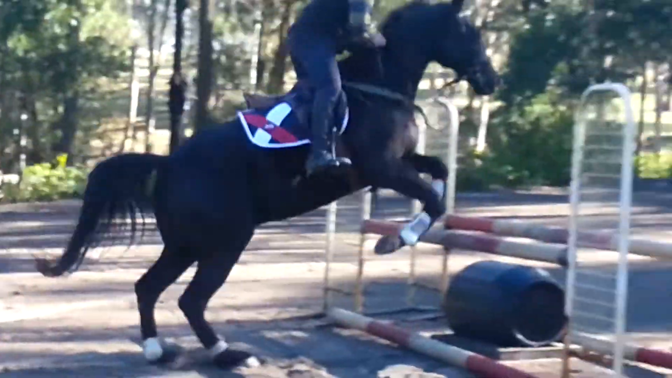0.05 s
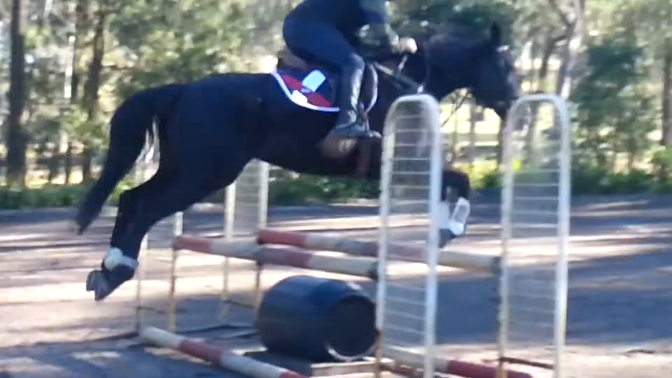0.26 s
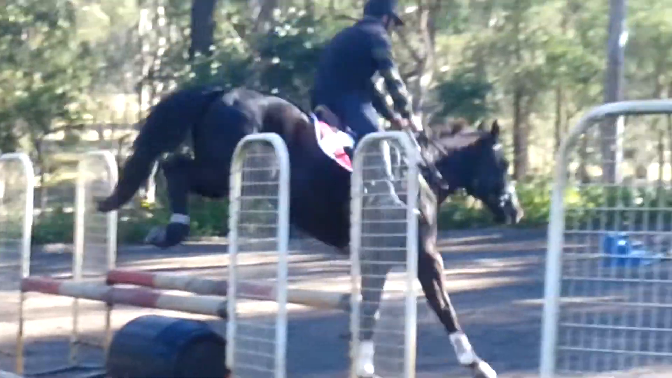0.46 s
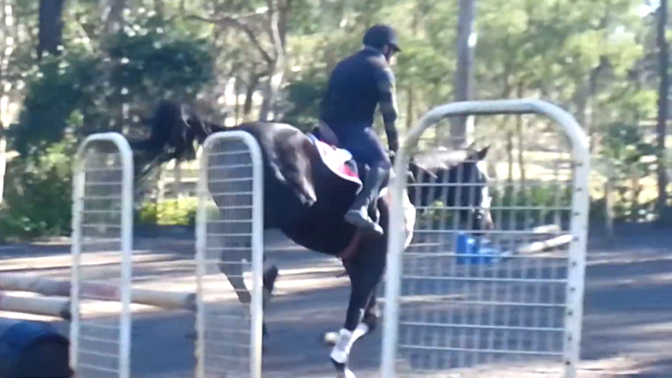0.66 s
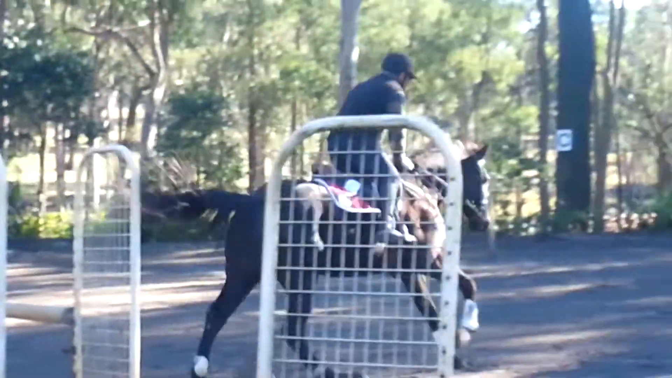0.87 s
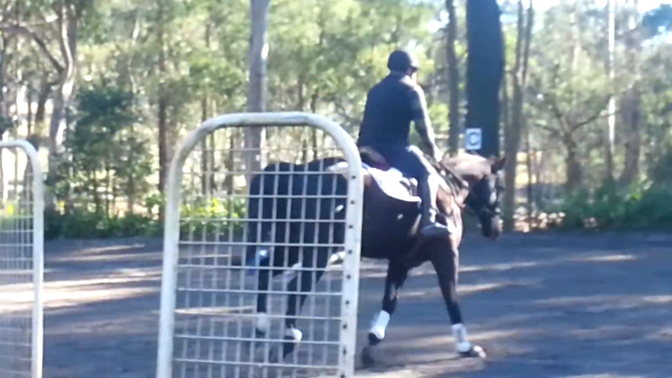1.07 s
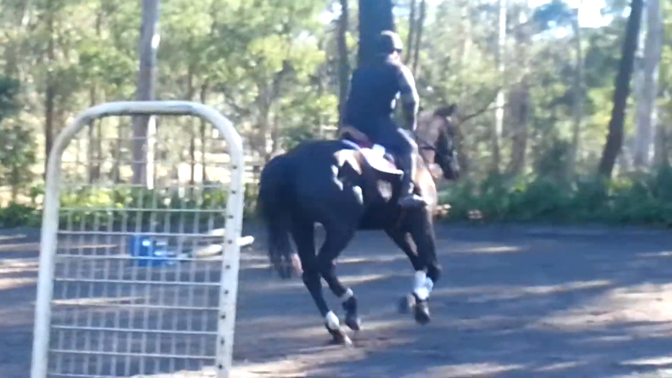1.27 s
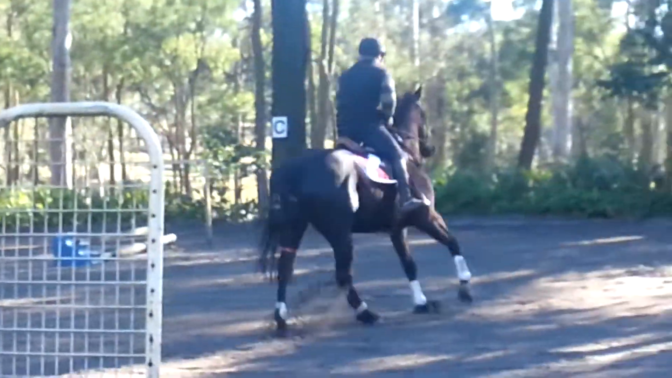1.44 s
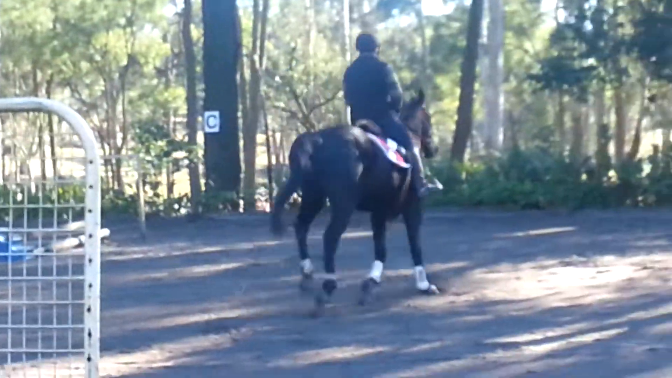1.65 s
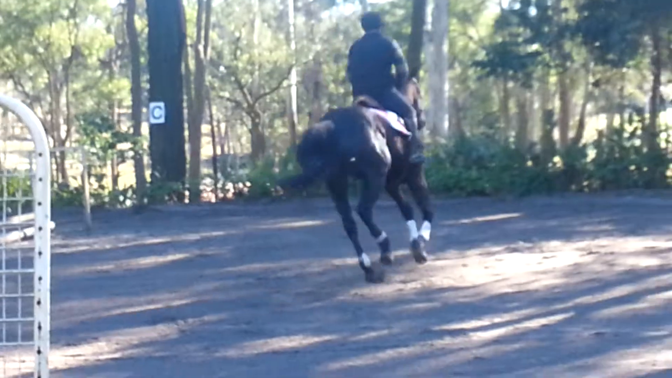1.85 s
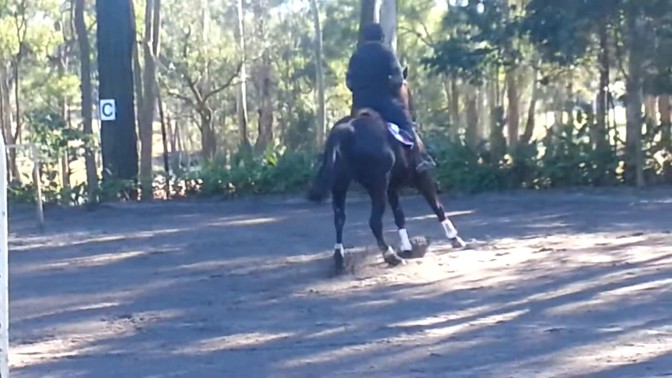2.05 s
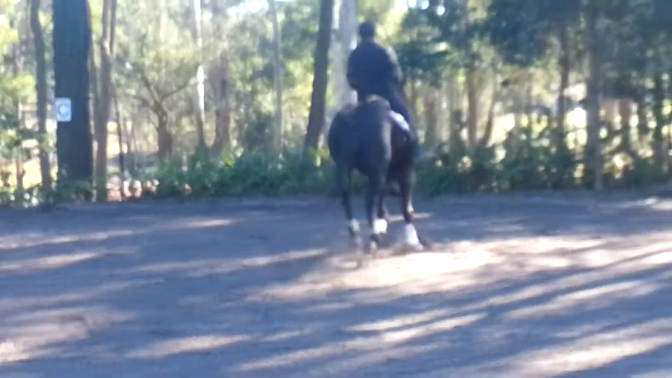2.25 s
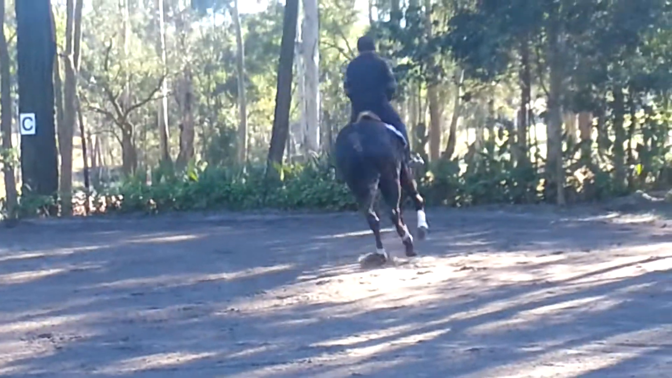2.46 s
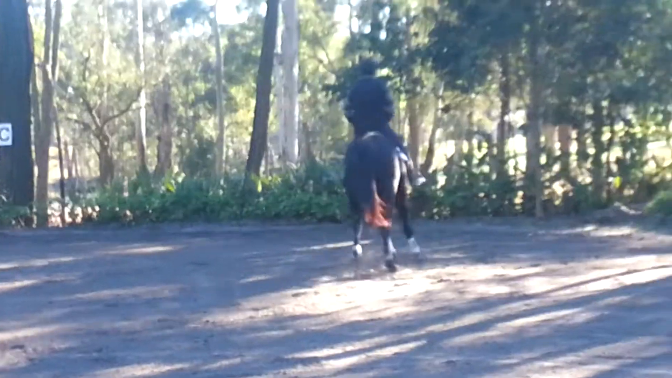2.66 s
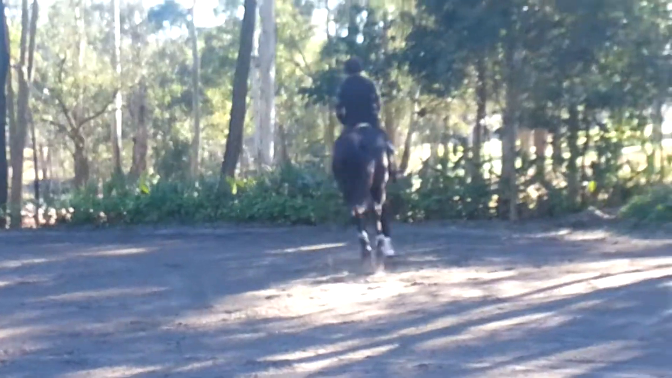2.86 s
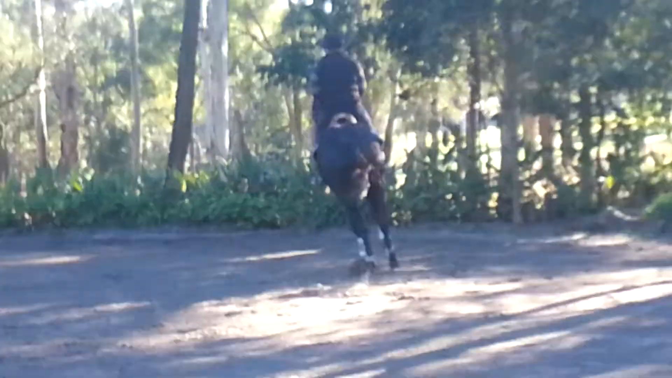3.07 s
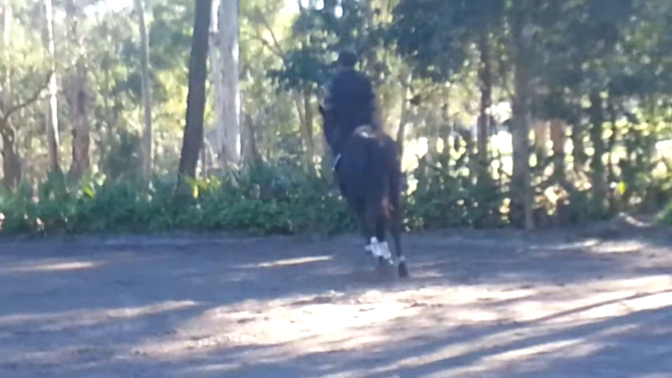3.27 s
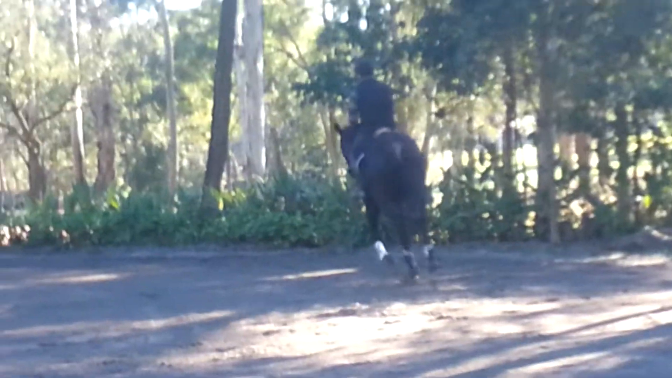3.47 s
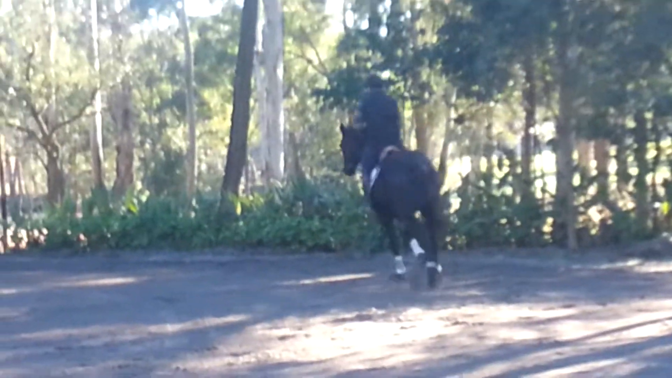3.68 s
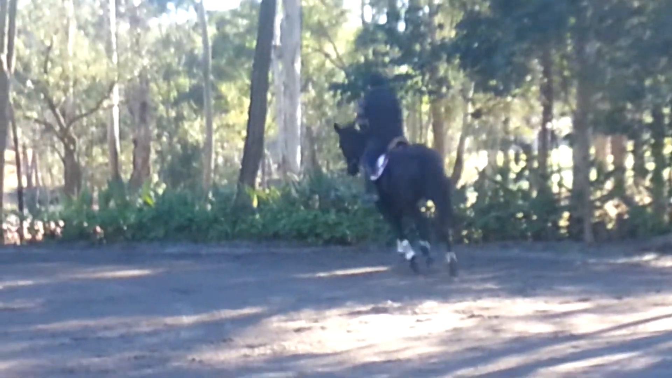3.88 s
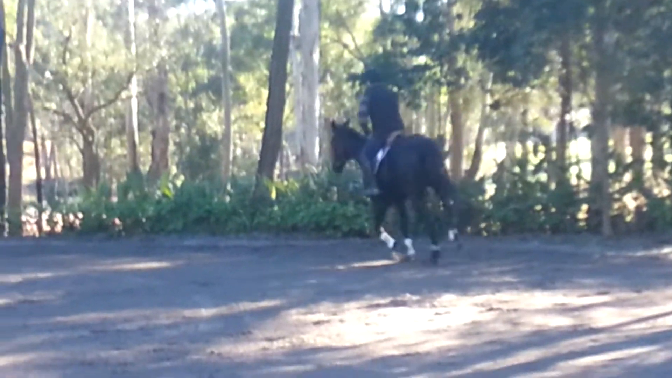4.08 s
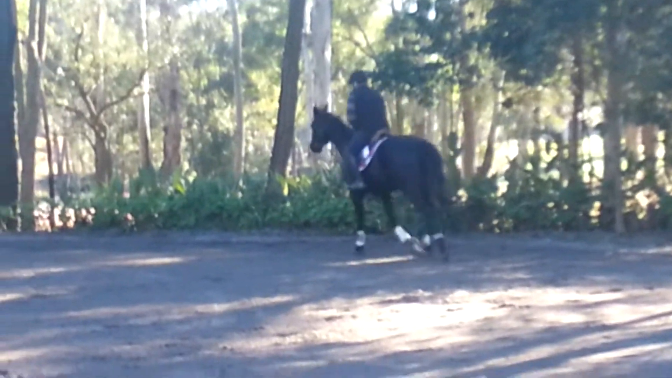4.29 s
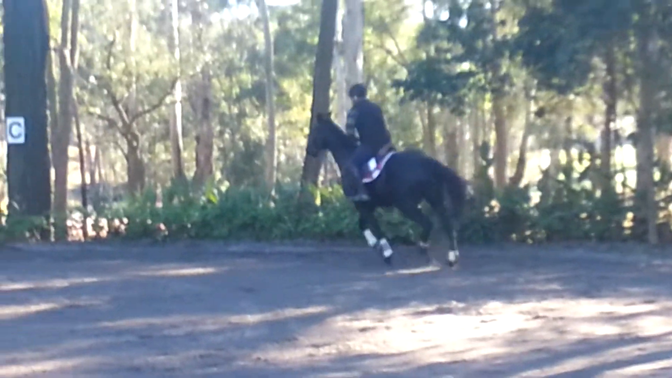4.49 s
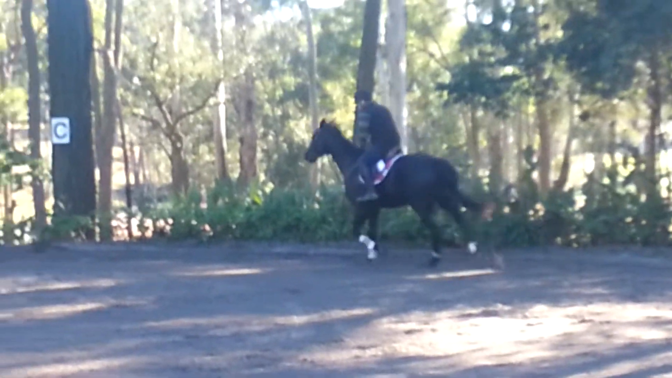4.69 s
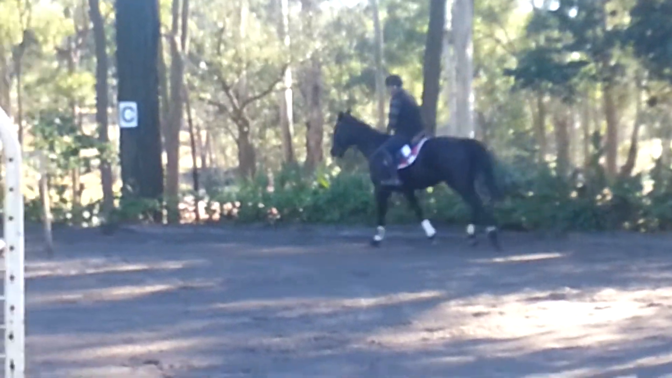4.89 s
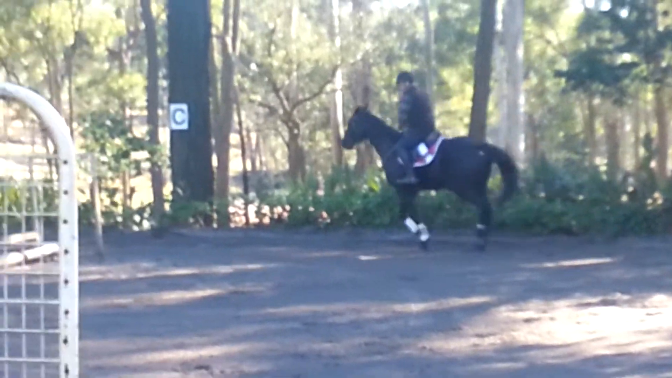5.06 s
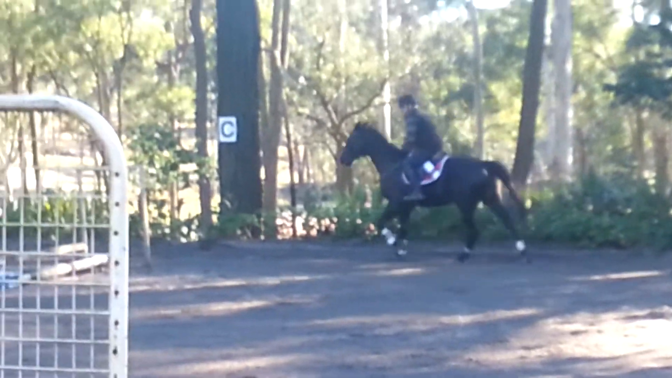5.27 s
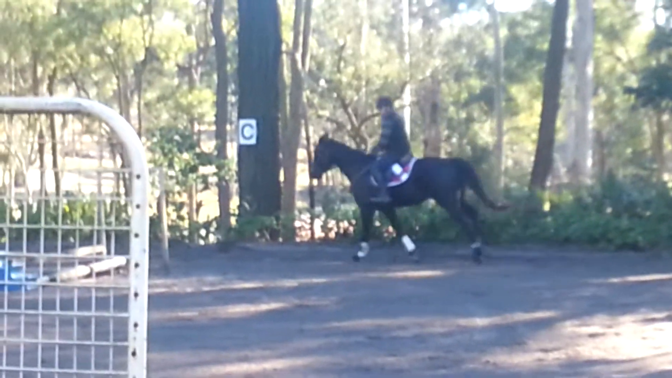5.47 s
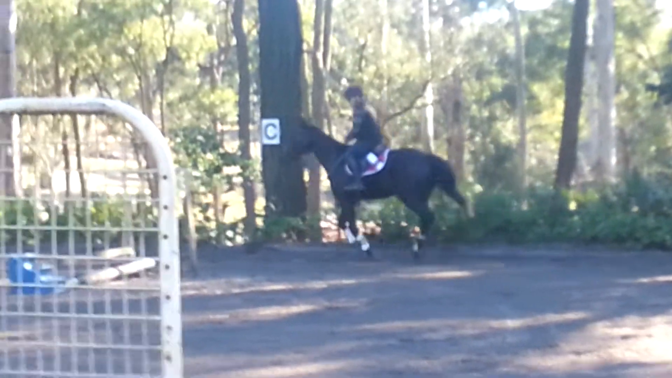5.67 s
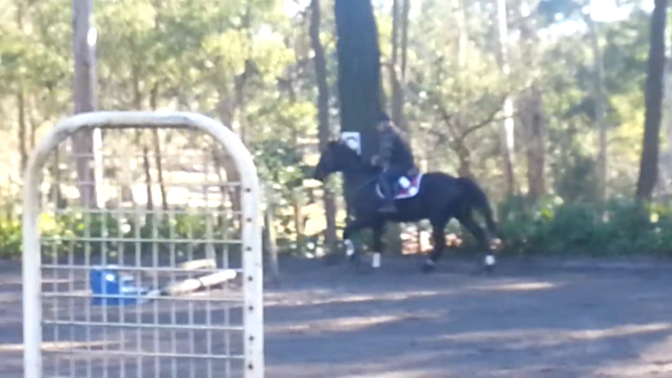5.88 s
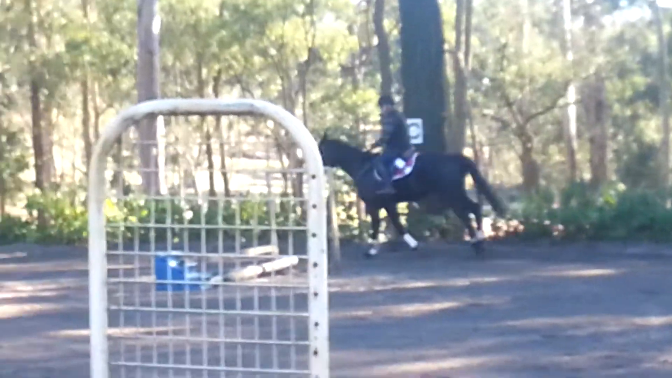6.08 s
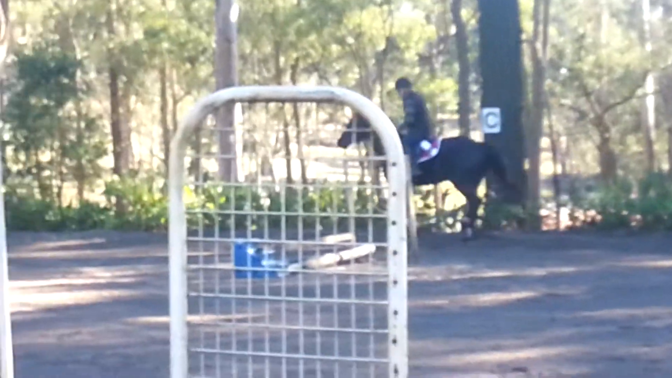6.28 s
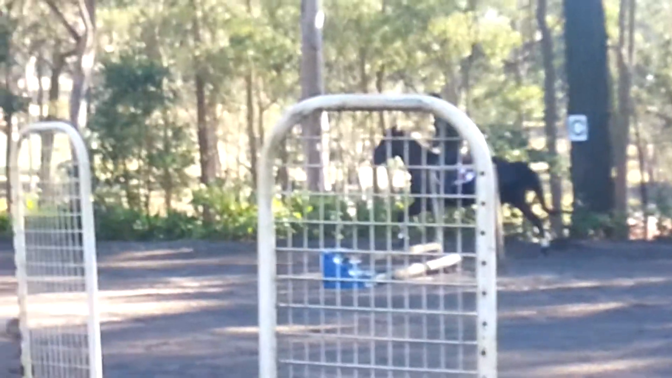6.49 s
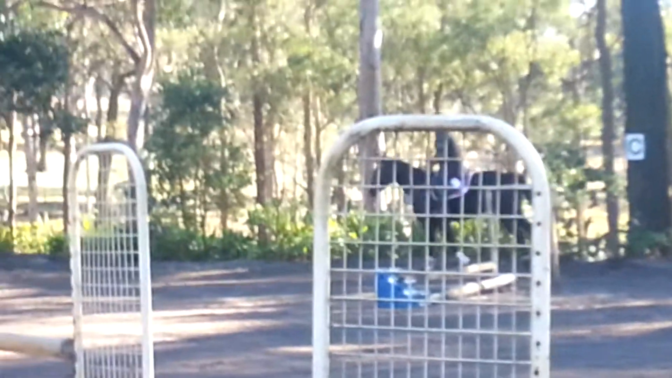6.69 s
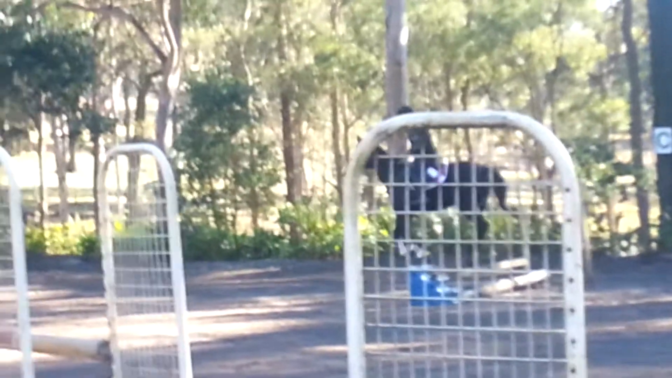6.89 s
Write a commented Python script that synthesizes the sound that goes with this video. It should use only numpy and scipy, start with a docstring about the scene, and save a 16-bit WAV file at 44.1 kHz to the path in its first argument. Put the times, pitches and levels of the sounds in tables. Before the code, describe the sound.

Open air among trees, with a steady low hum and thin hiss. At 0 s heavy hooves thud and scuff sand close by. At about 0.33 s a cluster of very quick, hard cracks strikes the rail, by far the loudest event; a bright steel ring and shaken mesh rattle die away by about 1.1 s. Irregular footfalls, knocks and gritty sand continue to 1.7 s, with a stronger deep thud at 1.64 s. From 2 s a soft three-beat canter repeats roughly every 0.6 s, growing fainter. Small birds whistle at 0.6 to 2.7 s, then clearer falling chirps at 3.7, 4.3 and 4.8 s and a string at 5.2 to 5.8 s. Tiny close clicks appear around 1.1, 1.6, 3.2 and 4.1 s, sharpest at 5.7 s on the right. Fluttering, breathy horse snorts come at 6.15 and 6.78 s, with faint bird pips.

```python
"""Hooves thud into sand, then a jumping horse raps the fence: quick cracks, a clanging steel stand, rattling mesh.
Birds whistle from the trees, with a few sharp clicks close by, as the horse canters off in three-beat strides.
It grows fainter, and near the end it snorts twice. A low outdoor hum lies under it all.
Hooves are damped sines, sand is grains in bursts, the fence is noise and decaying modes, birds are gliding
sines, and the snorts and the open air are shaped noise; scattered echoes set horse, fence and birds among trees."""
import sys
import numpy as np
from scipy import signal
from scipy.fft import rfft, irfft
from scipy.io import wavfile
from scipy.ndimage import uniform_filter1d

SR = 44100
rng = np.random.default_rng(int(sys.argv[2]) if len(sys.argv) > 2 else 0)


def inscribe(sig):
    """Save sig as 16-bit PCM at rate SR to the path in sys.argv[1].

    A 1-D sig is mono; a 2-D sig holds one channel per row.
    Samples are clipped to [-1, 1] before scaling.
    """
    pcm = np.round(np.clip(np.atleast_2d(sig).T, -1, 1) * 32767)
    wavfile.write(sys.argv[1], SR, pcm.astype(np.int16))


N = 306054  # length [samples]

# single footfalls, strong and faint, most around the jump, before trims:
# (time [s], thud [dB], hollow knock [dB], sand [dB])
SINGLE_FOOTFALLS = [(0.009, -32, -36, -41.5), (0.071, -28, -43, -42.5), (0.244, -41, -32.5, -37.5),
                    (0.275, -48, -50, -42), (0.537, -33, -43, -48), (0.609, -43, -32.5, -40),
                    (0.813, -43, -37, -47.5), (0.85, -43, -52, -39), (0.936, -38, -43, -41.5),
                    (0.967, -36, -47, -41), (0.989, -40, -52, -50), (1.054, -45, -43, -47),
                    (1.113, -39, -43, -47), (1.135, -41, -48, -42), (1.18, -52, -57, -46.5),
                    (1.31, -45, -42, -44), (1.35, -50, -48, -43), (1.395, -43, -39, -40),
                    (1.419, -43, -37.5, -50), (1.515, -41, -43, -44.5), (1.586, -46, -43, -47.5),
                    (1.64, -30, -48, -44.5), (1.715, -46, -50, -42), (3.19, -43, -54, -49),
                    (3.668, -54, -54, -48), (3.855, -52, -49, -49), (4.309, -39.5, -50, -58),
                    (4.334, -39.5, -51, -60), (6.764, -40, -53, -60), (6.79, -39, -53, -61)]
# far canter strides, before trims: (first beat [s], first to last beat [s], ground [dB], sand [dB])
CANTER_STRIDES = [(2.0, 0.27, -45.5, -50), (2.54, .33, -42.5, -50.5), (3.109, .276, -41.5, -54),
                  (3.668, .27, -49, -53), (4.19, .29, -51, -60), (4.79, .3, -47.5, -54),
                  (5.421, .29, -52, -53), (6.0, .29, -51, -60), (6.55, .287, -50, -63)]
# hind hoof, diagonal pair, leading fore: (share of the way from first to last beat, level [dB])
STRIDE_BEATS = [(0, 0), (0.62, -5), (1, 1)]
# spectrum of moving sand: (frequency [Hz], level per Hz [dB])
SAND_SPECTRUM = [(260, -17), (450, -5.5), (774, 6), (1150, -5.5), (1370, -0.5), (1710, 1), (2290, 1.5),
                 (2500, -1), (3890, -1), (6220, -10), (13700, -19), (15000, -34)]
# snorts, before the trim: (time of strongest nostril flap [s], its level [dB], opening flap level [dB])
SNORT_EVENTS = [(6.153, -37, -44), (6.7762, -34.7, -40)]
# spectrum of air through the nose: (frequency [Hz], level per Hz [dB])
NOSE_SPECTRUM = [(90, -22), (220, 5), (450, -14), (900, 2), (1500, -0.5), (2350, -2.5), (2700, -12),
                 (3400, -12.5), (4700, -7.5), (5700, -22), (9000, -33)]
# the hoof hits the fence and the rail chatters: (time [s], force [dB], contact time [s])
FENCE_BLOWS = [(0.328, -18, 0.00053), (0.331, -3, 0.00035), (0.334, -5.5, 0.000025),
               (0.337, -9.5, 0.000098), (0.343, -13, 0.00026), (0.354, -10.5, 0.000073),
               (0.3585, -22.5, 0.00012)]
# spectrum of the crack of each blow: (frequency [Hz], level per Hz [dB])
CRACK_SPECTRUM = [(71, -28), (120, -26), (238, 1), (524, -8), (629, -14), (835, -2.5), (1180, -8.5),
                  (1760, 0), (2540, -3), (2920, -15.5), (4290, 0.5), (6550, -13), (12800, -16.5),
                  (15000, -50)]
# modes of the rail's dull body: (frequency [Hz], level [dB], 60 dB decay [s])
RAIL_MODES = [(196.7, -13.5, .17), (229, -15, .1), (269, -9, 0.21), (324, -24, 0.056), (380, -28, 0.34),
              (508, -15.5, 0.25)]
# modes of the steel stand, before its fade: (frequency [Hz], level [dB], 60 dB decay [s])
STEEL_MODES = [(764, -6, 0.3), (1523, -21, 0.93), (1680, -22, 1.1), (2385, -14, 0.35), (2632, -15, 0.54),
               (2783, -18, 0.44), (3682, -22, 0.67), (3919, -9, 0.16), (4124, -15, 0.46), (4194, 0, 0.5),
               (4301, -14, 0.53), (4447, -15, 0.8), (4737, -25, 0.81), (4915, -25, 0.64), (5346, -29, 0.63)]
# spectrum of the shaken mesh: (frequency [Hz], level per Hz [dB])
MESH_SPECTRUM = [(150, -35), (270, -5), (600, -10), (780, -3), (1250, -12.5), (1600, -3.5), (2000, -17),
                 (2550, -2.5), (3200, -18), (4300, -1.5), (5200, -16.5), (6800, -24), (12000, -23),
                 (15000, -36)]
# small close clicks: (time [s], level [dB], ring [Hz], decay to 1/e [s], left-right [dB])
CLICK_EVENTS = [(1.0576, -24.5, 848, 0.0015, -2), (1.1147, -28.5, 650, .001, -2),
                (1.6213, -29, 4930, 0.00035, 15), (1.628, -30, 4450, .0007, -2),
                (3.1743, -31.5, 5600, 0.0004, 17), (4.076, -37.5, 2220, .0007, 5),
                (5.7067, -14, 1230, 0.00014, -31.5), (5.7084, -27.5, 234, 0.0034, -14),
                (5.714, -35, 1600, 0.0012, -14), (5.7351, -26.5, 4270, 0.00032, -14),
                (5.7715, -18.5, 3040, 0.00023, -16)]
# bird syllables: (time [s], singer, shape, length [s], pitch [Hz], level [dB])
BIRD_SYLLABLES = [(0.635, "left", "level", .04, 4550, -50), (0.672, "left", "fall", 0.042, 3190, -50.5),
                  (0.975, "left", "lift", .06, 4050, -53.5), (1.194, "left", "fall", .045, 2860, -56),
                  (1.758, "right", "rise", .115, 3700, -48), (1.902, "right", "level", 0.12, 4210, -44.5),
                  (2.198, "right", "rise", 0.096, 3480, -59), (2.37, "right", "lift", .1, 4000, -57),
                  (2.664, "far", "fall", 0.12, 5030, -57.5), (3.728, "near", "dive", .043, 4290, -42.5),
                  (3.788, "near", "arch", 0.043, 2420, -49), (4.263, "near", "dive", .047, 4220, -38.5),
                  (4.329, "near", "arch", .046, 2480, -47.5), (4.45, "left", "rise", 0.074, 4960, -59.5),
                  (4.781, "near", "fall", .026, 3560, -43.5), (4.806, "near", "arch", .027, 3250, -42.5),
                  (4.858, "near", "lift", .035, 2260, -49), (5.208, "left", "lift", 0.044, 4490, -55),
                  (5.312, "left", "sweep", .073, 4600, -49.5), (5.436, "left", "level", .047, 4516, -49.5),
                  (5.505, "left", "lift", .06, 4405, -49.5), (5.603, "left", "sweep", .044, 4600, -56.5),
                  (5.817, "left", "level", 0.039, 5130, -59)]
# syllable shapes: (swell from start to end [dB], pitch along the way [multiples of the syllable's pitch])
SYLLABLE_SHAPES = {"dive": (4, (1.15, 1.05, .995, .89, .68)), "arch": (-2, (.8, 1.09, 1.03, .79)),
                   "rise": (3, (.83, .96, 1.045, 1.18)), "sweep": (8, (.76, .89, 1.04, 1.24)),
                   "fall": (2, (1.12, 1.05, .95, .85)), "level": (-3, (1.03, 1, .985, .958)),
                   "lift": (0, (.95, 1.005, 1.01, 1))}
# singers: (left-right [dB], echo send [dB], delay of the left side [s], tone an octave below [dB])
BIRD_SINGERS = {"near": (5, -6, .00039, -30), "left": (5, -6, 0, -17), "right": (-4, -7, 0, -30),
                "far": (5, -6, 0, 1)}
# a farther bird piping on level notes: (time [s], pitch [Hz], level [dB])
BIRD_PIPS = [(3.895, 2630, -61), (4.12, 3340, -58), (4.17, 2640, -62), (6.34, 3350, -57.5),
             (6.5, 3340, -59.5), (6.635, 3350, -61)]
# decay of the echoes among the trees: (frequency [Hz], 60 dB decay [s])
TREE_DECAY = [(200, 0.22), (1500, 1.54), (4000, 1.03), (12000, 0.22)]
# spectrum of the open air: (frequency [Hz], level per Hz [dB])
AIR_SPECTRUM = [(15, -68), (25, -42), (59, -10.5), (150, -5), (186, -3), (394, -3), (427, -5.5), (729, -6),
                (1760, -17.5), (3350, -18.5), (3630, -16.5), (4870, -19.5), (5570, -25), (13800, -26.5),
                (15000, -37.5)]
# slow course of the air, before its trim: (time [s], level [dB])
AIR_LEVEL = [(0.0, -47), (0.23, -46.5), (3.77, -49.6), (6.94, -49.4)]
# what the two ears share of the air: (frequency [Hz], left-right likeness)
AIR_LIKENESS = [(60, 0.95), (150, 0.91), (380, 0.74), (950, -0.02), (2380, 0.079), (5980, -0.051),
                (15000, -0.033)]
# what they share of sand, cracks and mesh: (frequency [Hz], left-right likeness)
NEAR_LIKENESS = [(200, 1), (900, 0.93), (2200, 0.44), (4000, 0.4), (12000, 0.05)]
# what they share of the snorts: (frequency [Hz], left-right likeness)
FAR_LIKENESS = [(300, 0.9), (1200, 0.85), (5000, 0.73)]
# stereo tilt of the direct horse and fence: (frequency [Hz], left-right [dB])
STEREO_TILT = [(300, -0.5), (1500, -2), (2300, 4.5), (3400, 1.5), (4200, 2), (5500, 8.5), (8000, 1.5),
               (12000, -7)]

FAR_THUD_DB = -4  # a far thud against its knock, before the trims of both
SCUFF_LAG_S, SCUFF_HALF_S = 0.0067, 0.0125  # the hoof slides just after it lands
SPRAY_LAG_S, SPRAY_HALF_S, SPRAY_DB = 0.04, 0.035, -12  # thrown sand falls back; level against the scuff
FLAP_GAP_S, FLAP_HALF_S = 0.0342, 0.0066  # the first flap
FLAP_SLOWING, FLAP_FADE_DB = 1.15, -6  # each flap is slower and weaker as the air runs out
STEEL_DB = -19.8
EDGE_HZ = 15000


def hooves(thud_hz=225, thud_s=0.0024, thud_db=3, knock_hz=680, knock_s=0.0012, knock_db=1):
    """Each hoof gives the packed ground a damped low push, with a short knock of the horn."""
    out, t, steps = np.zeros((2, N)), clock(.08), footfalls()
    chances = rng.uniform(-0.97, 1, (len(steps), 2))
    for (s, low_db, high_db, _), (thud_chance, knock_chance) in zip(steps, chances):
        thud = low_db + thud_db, thud_hz * (1 + 0.24 * thud_chance), thud_s
        knock = high_db + knock_db, knock_hz * (1 + 0.27 * knock_chance), knock_s
        for db, hz, rise in (thud, knock):
            push = t / rise * np.exp(1 - t / rise)  # peaks after the rise time
            add(out, s, amp(db) * push * np.sin(2 * np.pi * hz * t))
    return out


def footfalls():
    """Every hoof that lands, as (s, thud dB, knock dB, sand dB): the single ones, then the three-beat canter."""
    steps = list(SINGLE_FOOTFALLS)
    for s, spread, ground_db, sand_db in CANTER_STRIDES:
        for share, db in STRIDE_BEATS:
            knock_db = ground_db + db
            steps.append((s + share * spread, knock_db + FAR_THUD_DB, knock_db, sand_db + db))
    return steps


def sand(level_db=0):
    """Thousands of grains of uneven size: a scuff under each hoof, then a spray behind it."""
    sizes = amp(3 * np.minimum(rng.exponential(1, (2, N)), 3.5)) * rng.choice([-1, 1], (2, N))
    grains = sizes * (rng.random((2, N)) < 2500 / SR)  # 2500 grains a second in each signal
    scuffs = [(s + SCUFF_LAG_S, db, SCUFF_HALF_S) for s, _, _, db in footfalls()]
    sprays = [(s + SPRAY_LAG_S, db + SPRAY_DB, SPRAY_HALF_S) for s, _, _, db in footfalls()]
    return amp(level_db) * swells(scuffs + sprays) * colour(grains, SAND_SPECTRUM, NEAR_LIKENESS)


def snorts(level_db=-1, body_db=-13):
    """Air blown through the horse's nose, chopped and roughened by its fluttering nostrils."""
    rows = [flap for snort in SNORT_EVENTS for flap in flutter(*snort)]
    flaps = swells(rows, rise=.45, fall=1.1)
    stream = amp(body_db) * uniform_filter1d(flaps, size=3000)  # some air leaks between the flaps
    rasp = evened(amp(3 * drift(N, .001)))
    return amp(level_db) * (flaps + stream) * rasp * hiss(NOSE_SPECTRUM, FAR_LIKENESS)


def flutter(s, db, opening_db, count=4):
    """The nostril flaps of one snort, as (s, dB, half length s): an opening flap, then a slowing, fading run."""
    flaps = [(s - FLAP_GAP_S, opening_db, FLAP_HALF_S)]
    for k in range(count):
        stretch = FLAP_SLOWING ** (k + 1)
        flaps.append((s, db + k * FLAP_FADE_DB, FLAP_HALF_S * stretch))
        s = s + FLAP_GAP_S * stretch
    return flaps


def fence(crack_db=-3.4, crack_t60=0.078, crack_side_db=0.5, rail_db=-2, steel_side_db=1,
          rattle_db=-36, rattle_t60=0.92, rattle_side_db=0.5):
    """Quick blows crack on the rail; they set the steel stand ringing and its mesh rattling."""
    out, t = np.zeros((2, N)), clock(.8)
    rail = amp(rail_db) * ring(RAIL_MODES, t)
    for s, db, contact in FENCE_BLOWS:
        noise = hiss(CRACK_SPECTRUM, NEAR_LIKENESS, size=len(t))
        crack = amp(crack_db - 60 * t / crack_t60) * pan(crack_side_db) * noise
        soft = np.exp(-1 / (contact * SR))  # a longer contact takes away treble
        add(out, s, amp(db) * signal.lfilter([1 - soft], [1, -soft], crack + rail))
    sharpest = min(FENCE_BLOWS, key=lambda blow: blow[2])[0]  # time of the shortest contact
    # the stand takes up the shaking over several blows, and is damped at last
    shaking = (1 - np.exp(-t / .018)) * np.cos(np.pi / 2 * t / t[-1])
    add(out, sharpest, amp(STEEL_DB) * pan(steel_side_db) * shaking * ring(STEEL_MODES, t))
    add(out, sharpest, amp(rattle_db) * pan(rattle_side_db) * mesh(t, rattle_t60))
    return out


def ring(modes, t):
    """Decaying modes of a struck body."""
    return sum(amp(db - 60 * t / t60) * np.sin(2 * np.pi * hz * t) for hz, db, t60 in modes)


def mesh(t, t60, count=170, buzz=1.0):
    """A crowd of wire resonances at chance pitches, with buzz where wires touch; the buzz outlasts the wires."""
    hz = rng.uniform(250, 6500, count)
    decay = t60 * rng.uniform(0.78, 0.86, count)
    phase = rng.uniform(0, 2 * np.pi, (count, 2, 1))
    wires = sum(amp(-60 * t / d) * np.sin(2 * np.pi * f * t + p) for f, d, p in zip(hz, decay, phase))
    touching = buzz * amp(-60 * t / t60) * rng.standard_normal((2, len(t)))
    return colour(wires / np.sqrt(count) + touching, MESH_SPECTRUM, NEAR_LIKENESS)


def birds(waver=0.007, flutter_db=2):
    """Gliding, fluttering whistles, and the share of each that goes into the trees."""
    out, sent = np.zeros((2, 2, N))
    for s, singer, shape, length, pitch, db in BIRD_SYLLABLES:
        side_db, echo_db, lag, under_db = BIRD_SINGERS[singer]
        swell_db, bends = SYLLABLE_SHAPES[shape]
        t = clock(length)
        # a smooth curve through the pitch points
        curve = np.polyfit(np.linspace(0, 1, len(bends)), bends, len(bends) - 1)
        hz = pitch * np.polyval(curve, t / length)
        turns = np.cumsum(hz * (1 + waver * drift(len(t), 0.0057))) / SR
        turns = turns - np.outer([1, 0], hz * lag)  # the left side lags
        effort_db = swell_db * t / length + flutter_db * drift(len(t), .006)
        effort = signal.windows.tukey(len(t), .3) * amp(effort_db)
        tone = np.sin(2 * np.pi * turns) + amp(under_db) * np.sin(np.pi * turns)
        whistle = amp(db) * evened(pan(side_db) * effort * tone)
        add(out, s, whistle)
        add(sent, s, amp(echo_db) * whistle)
    t = clock(.06)
    for s, hz, db in BIRD_PIPS:
        effort = np.sin(np.pi * t / t[-1]) * amp(3 * drift(len(t), .005))
        pip = amp(db) * evened(effort * np.sin(2 * np.pi * hz * t))
        add(out, s, pip)
        add(sent, s, pip / 2)
    return out, sent


def clicks():
    """Tiny hard contacts that ring very briefly; the high ones are gritty."""
    out, t = np.zeros((2, N)), clock(.03)
    for s, db, hz, decay, side_db in CLICK_EVENTS:
        grit = np.clip(rng.standard_normal((2, len(t))), -1, 1) * .3 * min(hz / 4000, 1)
        add(out, s, amp(db) * pan(side_db) * np.exp(-t / decay) * (np.sin(2 * np.pi * hz * t) + grit))
    return out


def trees(x):
    """Scattered echoes from the trunks: a quick cluster, then a thin tail that dies band by band."""
    taps = rng.standard_normal((2, SR)) * (rng.random((2, SR)) < 2000 / SR)
    hz, t, bands = signal.stft(taps, SR, nperseg=256)
    cluster = amp(10 * np.exp(-t / .04)) * (1 - np.exp(-t / .004))
    fading = amp(-60 * t / read(TREE_DECAY, hz)[:, None])
    tail = signal.istft(bands * cluster * fading, SR, nperseg=256)[1]
    return signal.fftconvolve(x, tail / np.linalg.norm(tail[0]), axes=1)[:, :N]


def air(level_db=1.0, flutter_db=0.5):
    """The low hum and thin hiss of the open air; only the hum is slightly unsteady."""
    level = np.interp(np.arange(N) / SR, *np.transpose(AIR_LEVEL))
    wash = hiss(AIR_SPECTRUM, AIR_LIKENESS)
    hum = signal.sosfiltfilt(signal.butter(2, 1000, fs=SR, output="sos"), wash)
    unsteady = hum * amp(flutter_db * drift(N, 0.075))
    return amp(level + level_db) * (wash - hum + unsteady)


def amp(db):
    """Decibels to gain."""
    return 10 ** (np.asarray(db) / 20)


def evened(x):
    """Scales to rms 1."""
    return x / np.sqrt(np.mean(x ** 2) + 1e-20)


def read(points, hz):
    """A table of (Hz, value) read on a log-frequency axis."""
    f, value = np.transpose(points)
    return np.interp(np.log(hz + 1), np.log(f + 1), value)


def add(mix, s, sound):
    """Mixes a sound in at time s."""
    part = mix[:, max(round(s * SR), 0):][:, :sound.shape[-1]]
    part += sound[..., :part.shape[1]]


def pan(side_db):
    """Left and right gains for a level difference."""
    return amp(np.array([[side_db], [-side_db]]) / 2)


def clock(seconds):
    """Sample times from zero."""
    return np.arange(int(seconds * SR)) / SR


def colour(source, spectrum, likeness):
    """Two unrelated signals given a spectrum and partly shared between the ears; rms 1."""
    size = source.shape[1]
    hz = np.fft.rfftfreq(size, 1 / SR)
    mid, side = rfft(source) * amp(read(spectrum, hz))
    same = np.clip(read(likeness, hz), -1, 1)
    mid, side = mid * np.sqrt(1 + same), side * np.sqrt(1 - same)
    return evened(irfft(np.array([mid + side, mid - side]), size))


def hiss(spectrum, likeness, size=N):
    """Coloured stereo noise."""
    return colour(rng.standard_normal((2, size)), spectrum, likeness)


def swells(rows, rise=0.97, fall=0.93):
    """Envelope of bursts (s, dB, half length s); rise and fall scale the half length on either side of the peak."""
    t = np.arange(N) / SR
    power = np.zeros(N)
    for s, db, half in rows:
        near = slice(max(int((s - 12 * half) * SR), 0), int((s + 12 * half) * SR))
        u = (t[near] - s) / half
        power[near] += amp(2 * db) / (1 + (u / np.where(u < 0, rise, fall)) ** 2 / 2) ** 3
    return np.sqrt(power)


def drift(size, seconds):
    """Smooth chance of rms 1 that changes within the given time."""
    span = max(int(seconds * SR), 2)
    smooth = uniform_filter1d(rng.standard_normal(size), span, mode="wrap")
    return evened(uniform_filter1d(smooth, span, mode="wrap"))


def thin(x, corner_hz=140):
    """Cuts the deep bass below the corner."""
    return signal.sosfilt(signal.butter(3, corner_hz, "high", fs=SR, output="sos"), x)


def tilted(x):
    """Colours left and right in opposite ways."""
    half_db = read(STEREO_TILT, np.fft.rfftfreq(N, 1 / SR)) / 2
    return irfft(rfft(x) * amp(np.array([half_db, -half_db])), N)


def scene():
    """Horse, fence and birds among the trees; the clicks are too close to echo."""
    horse = thin(hooves() + sand() + snorts(), corner_hz=120)
    clang = thin(fence(), corner_hz=173)
    song, song_echo = birds()
    echo = trees(amp(-10.5) * horse + amp(-14.5) * clang + song_echo)
    return tilted(horse + clang) + song + echo + thin(clicks(), corner_hz=120) + air()


def record(dry):
    """Limits to full scale, then cuts the treble above the band edge."""
    edge = signal.firwin(401, EDGE_HZ, window=("kaiser", 8), fs=SR)
    return signal.oaconvolve(np.clip(dry, -1, 1), edge[None], "same")


dry = scene()
out = record(dry)
inscribe(out)
```